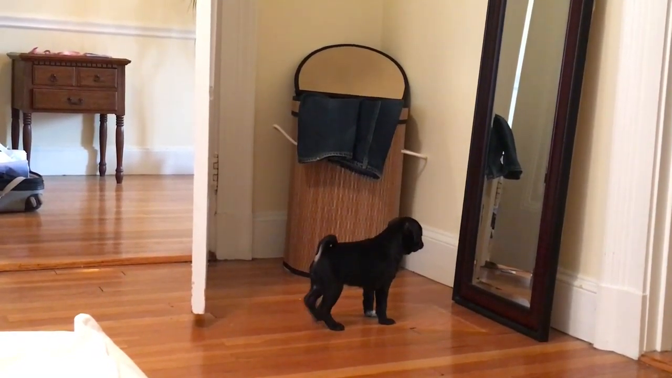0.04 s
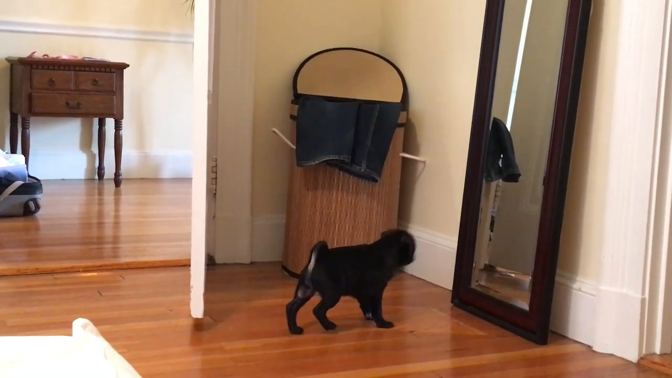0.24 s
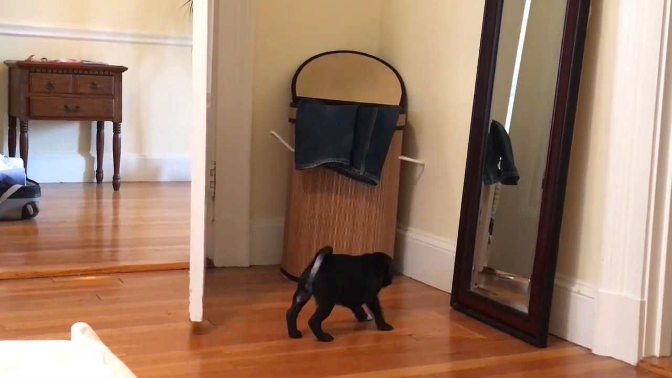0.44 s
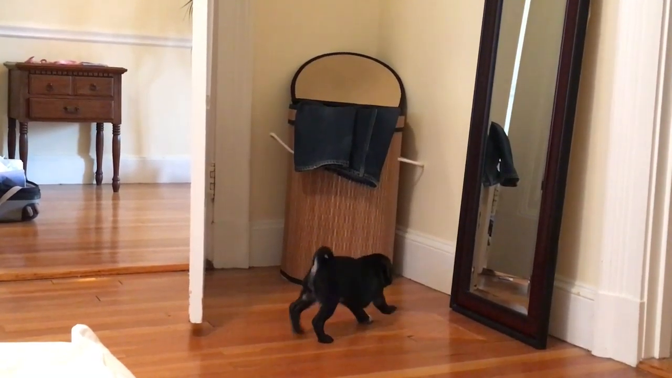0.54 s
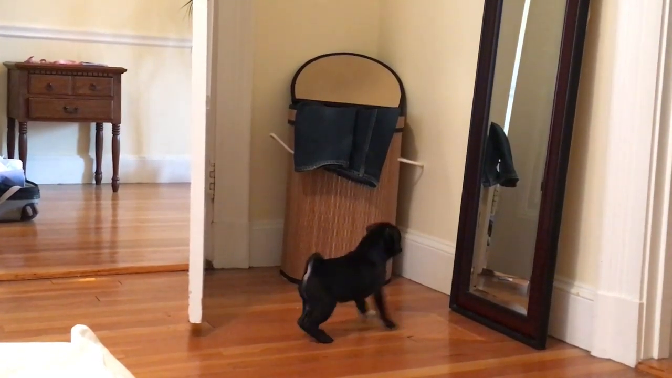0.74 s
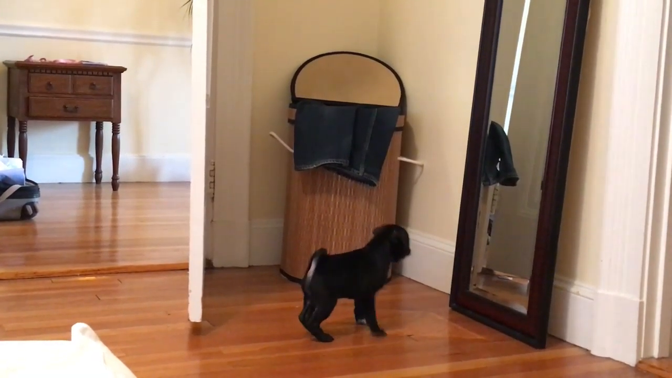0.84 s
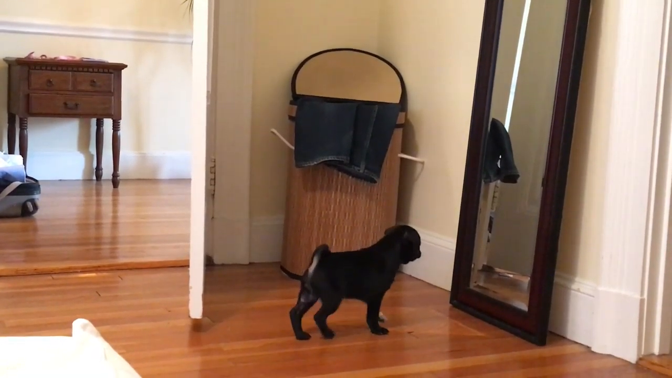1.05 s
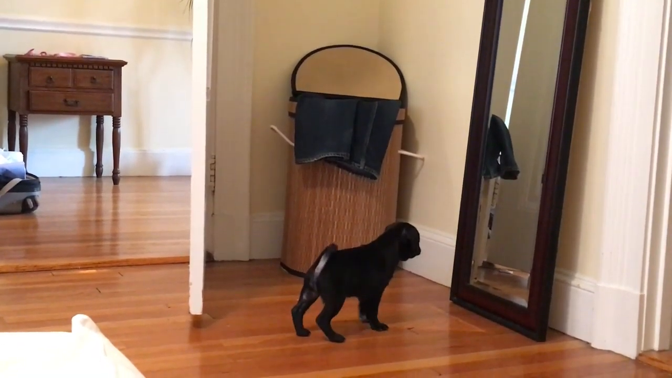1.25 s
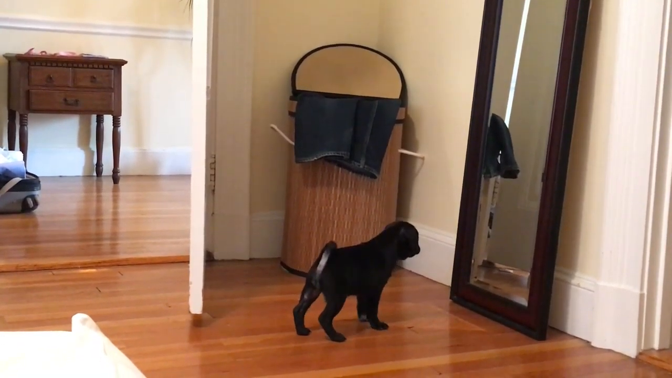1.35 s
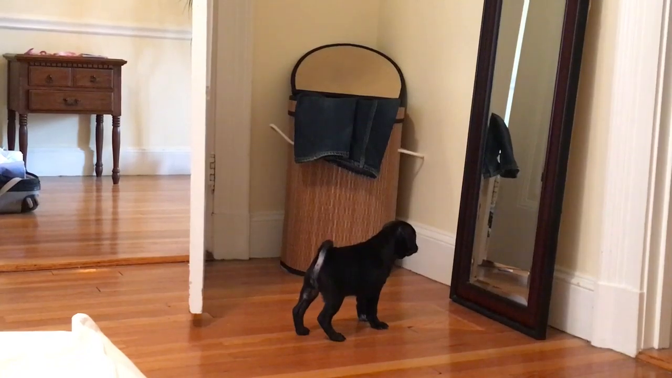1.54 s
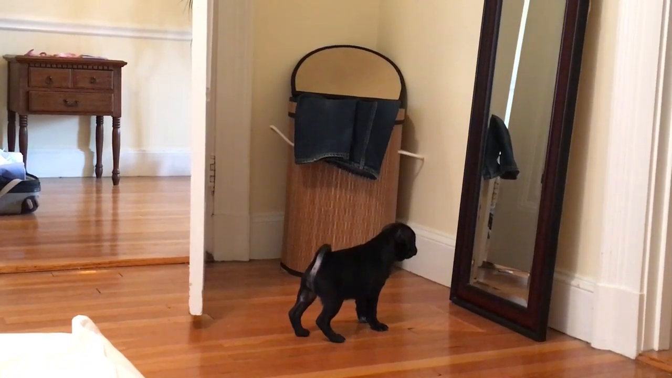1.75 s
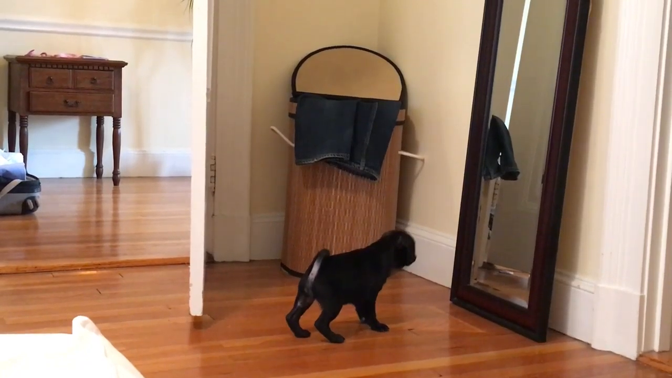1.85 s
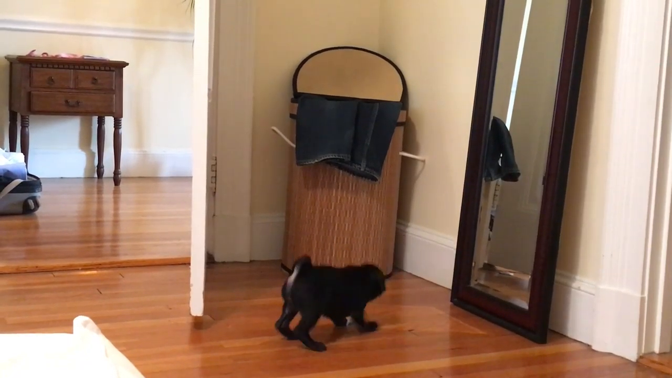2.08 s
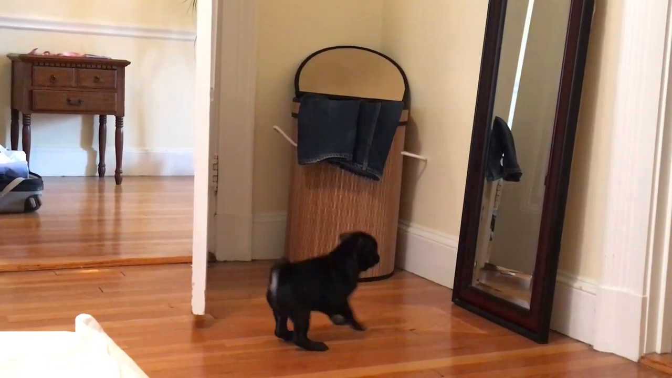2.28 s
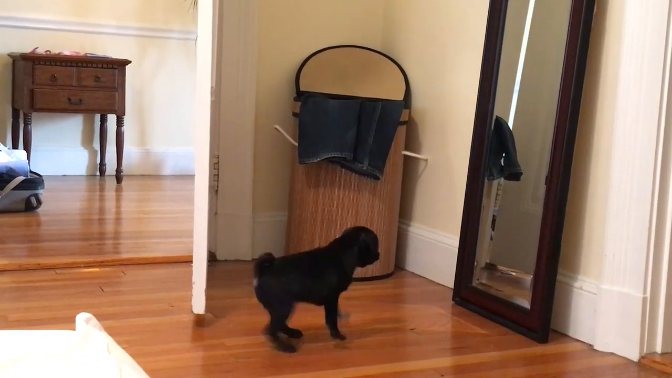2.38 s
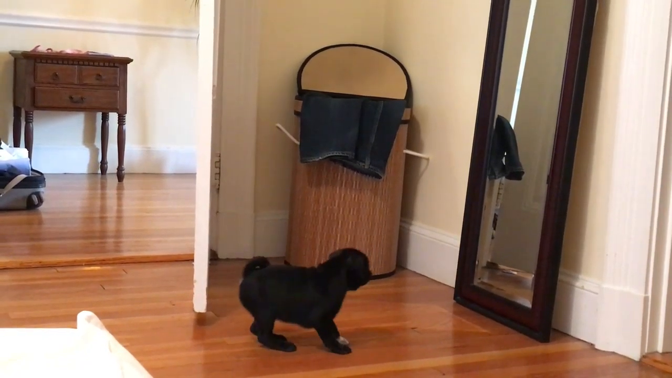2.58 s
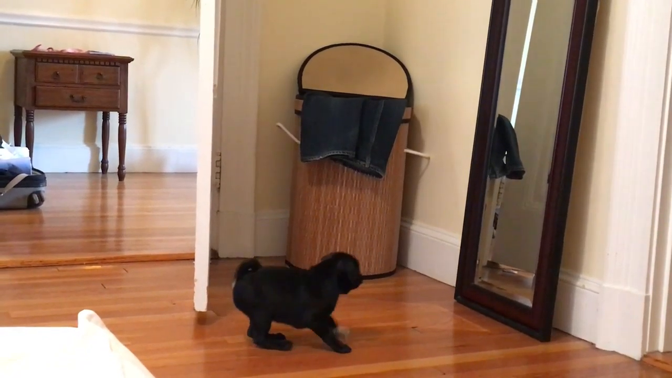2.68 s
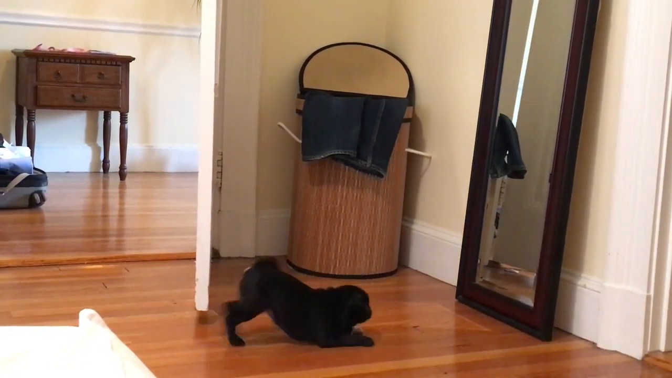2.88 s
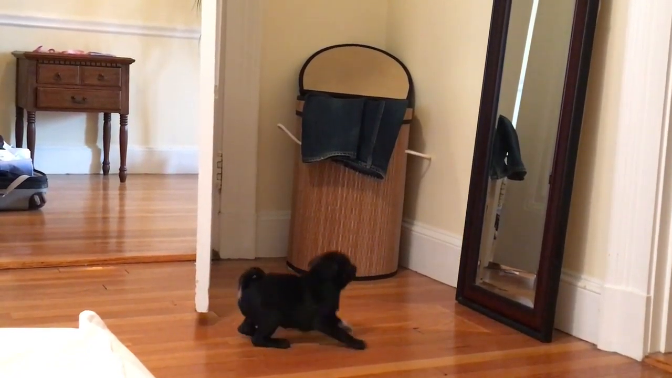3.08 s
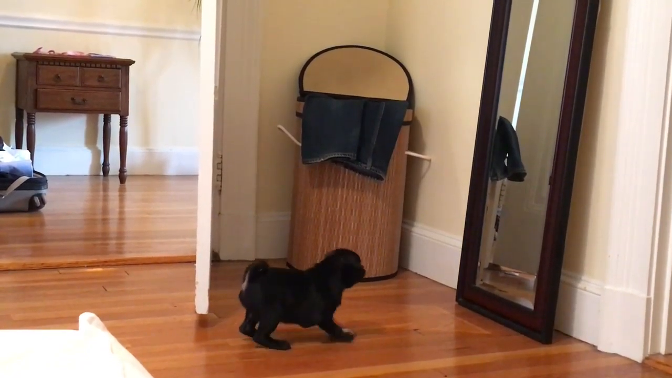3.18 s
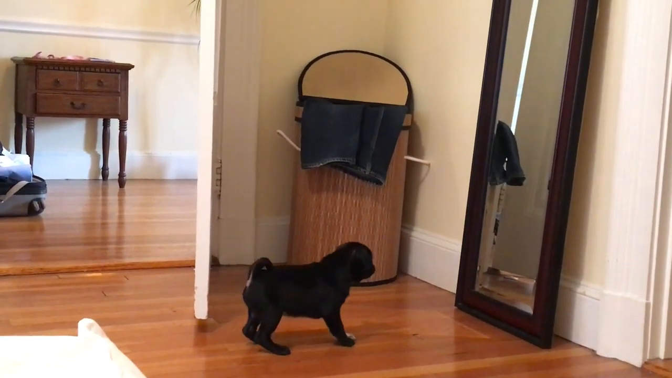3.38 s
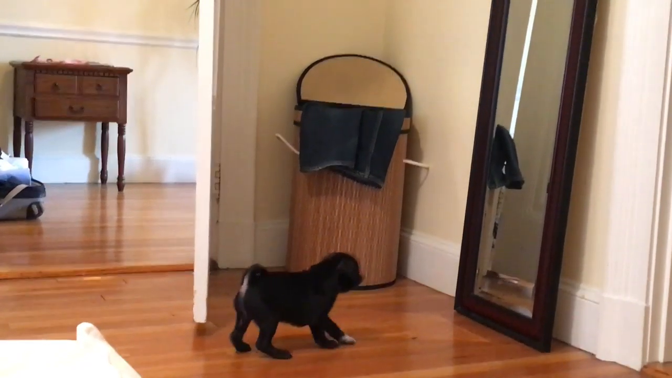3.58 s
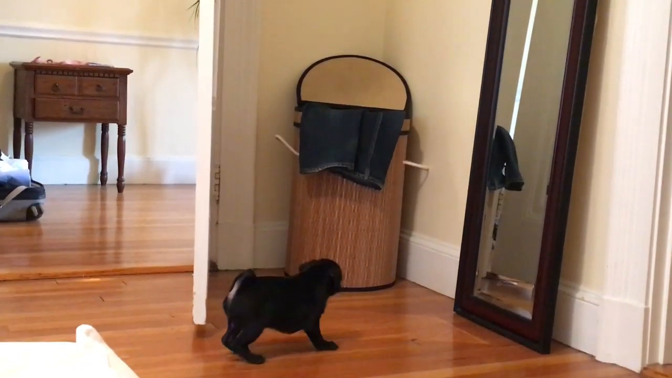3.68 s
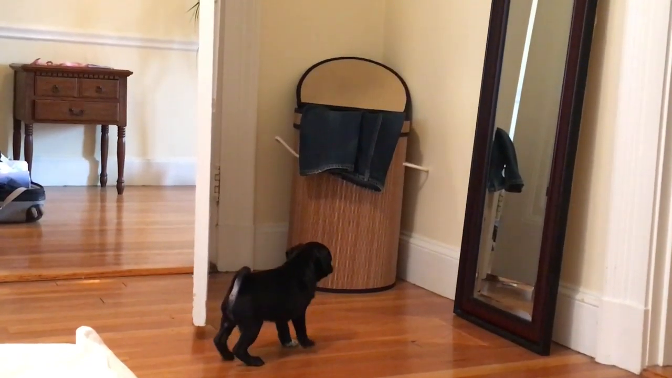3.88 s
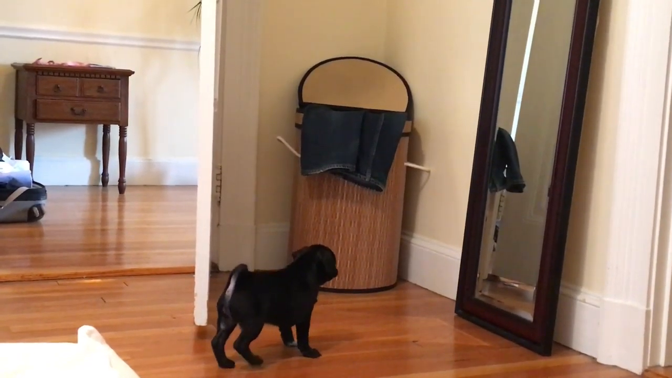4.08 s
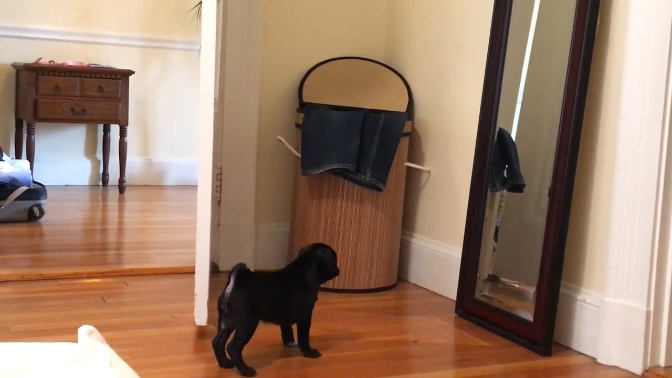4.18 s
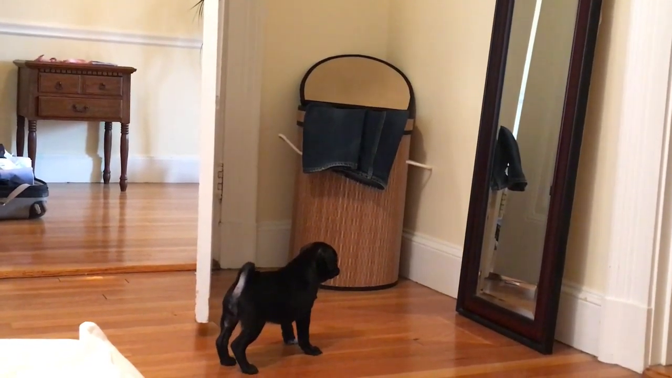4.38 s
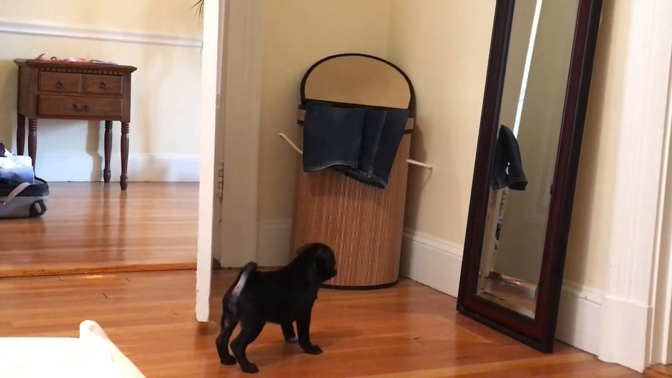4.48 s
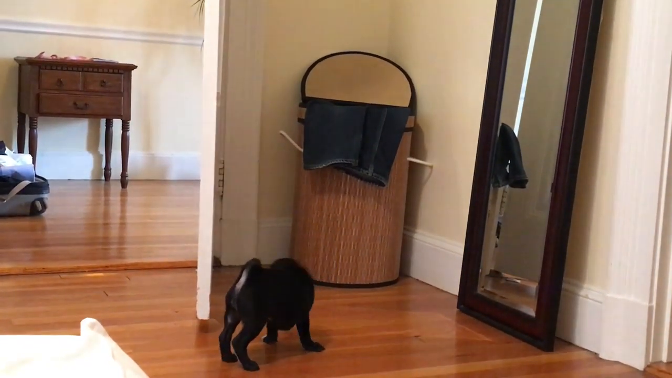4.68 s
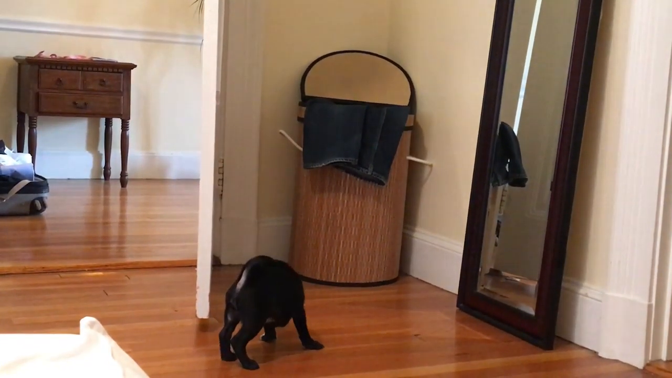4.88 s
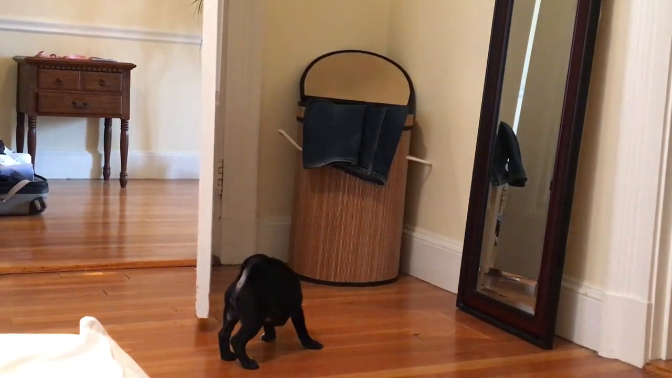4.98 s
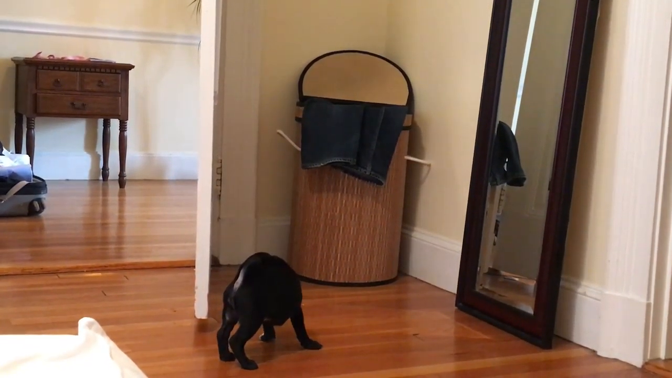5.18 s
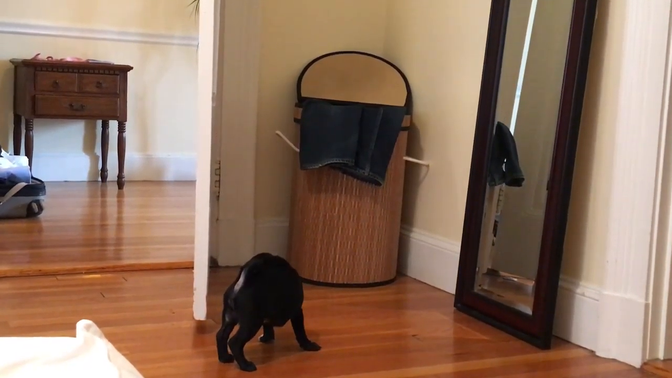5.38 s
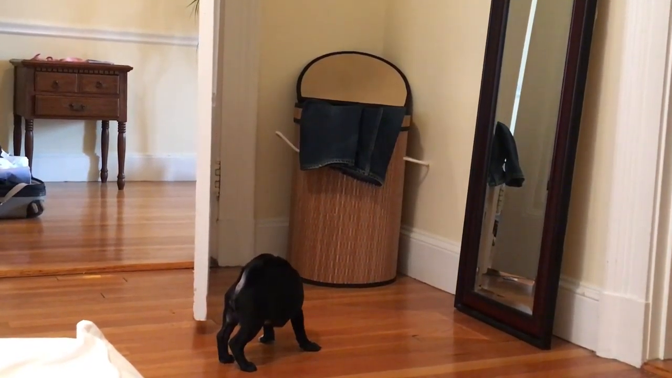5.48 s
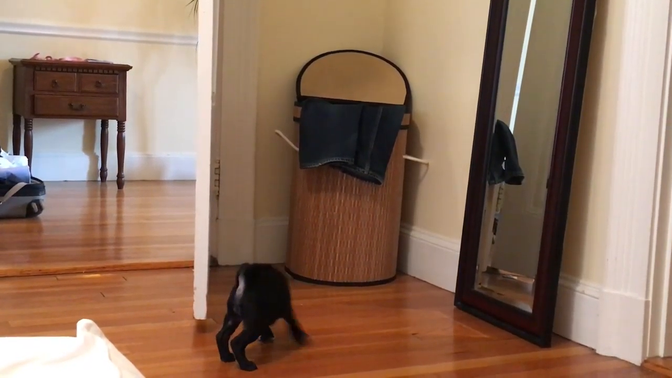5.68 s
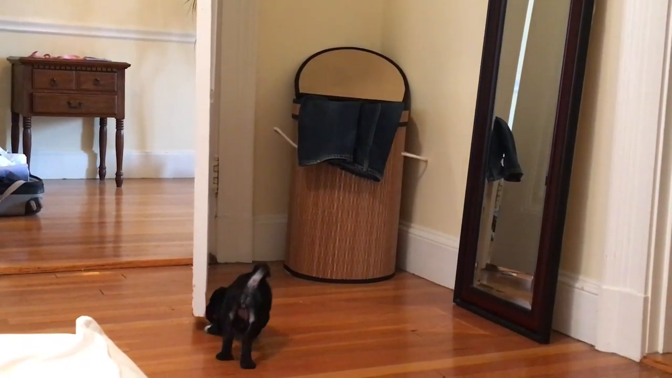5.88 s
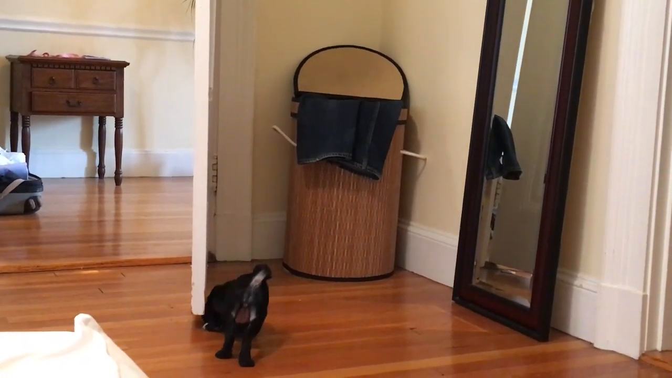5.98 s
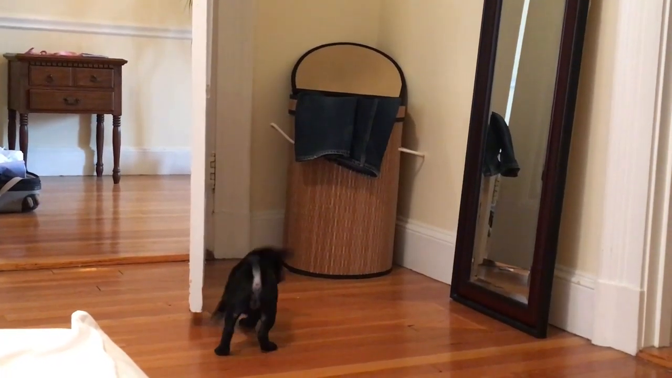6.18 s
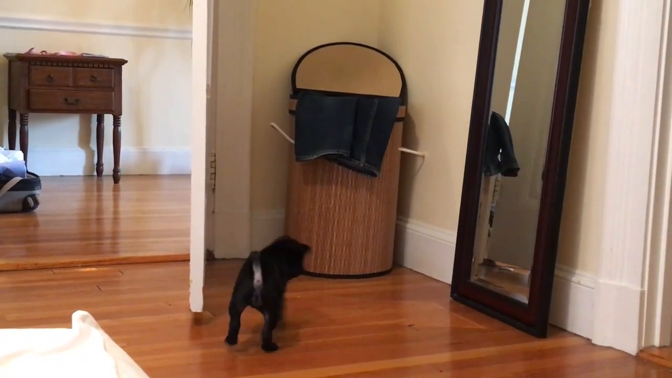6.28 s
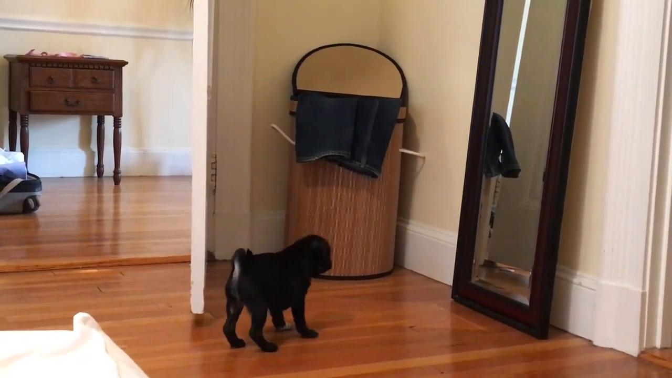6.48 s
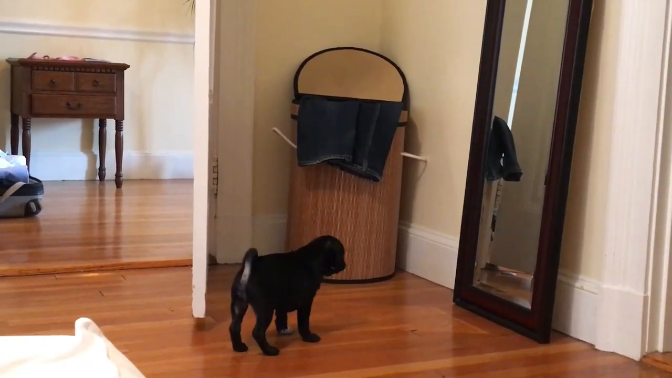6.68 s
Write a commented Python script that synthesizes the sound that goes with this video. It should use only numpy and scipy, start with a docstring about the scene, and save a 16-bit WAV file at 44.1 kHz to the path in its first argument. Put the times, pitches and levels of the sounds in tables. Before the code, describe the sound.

A tiny puppy a few metres away in a bare, echoing room. A faint whine and snuffles come first, then a loud sharp bark at two seconds and a lower, hoarser one soon after. A soft wavering growl rises into a whiny yip. Paws thump and claws tick on wood. After a pause come a rough yelp, a thin whimper and a last bright yip, over low house rumble and faint hiss.

```python
"""A bare room with a wooden floor, where a flat-faced puppy whines, barks three times, growls and yips at a mirror.
It is a few metres away. Its voice is a row of overtones plus puffs of noise, shaped by throat and mouth.
Between calls it snuffles and pants: noise rings its nose and hisses at its lips, and a nostril whistles.
Short pushes make the boards boom under its paws, and bursts of noise make its claws tick and knock.
The boards rumble on around each landing, the room echoes, and a low house rumble and a hiss lie beneath."""
import sys
import numpy as np
from scipy import signal
from scipy.fft import rfft, irfft, next_fast_len
from scipy.io import wavfile
from scipy.ndimage import uniform_filter1d, map_coordinates

SR = 44100
rng = np.random.default_rng(int(sys.argv[2]) if len(sys.argv) > 2 else 0)


def wav_record(signal):
    """Record a signal, one row per channel, as 16-bit PCM in the file named by sys.argv[1]."""
    frames = np.transpose(np.atleast_2d(signal))
    bounded = np.clip(frames, -1, 1)
    # unit amplitude maps onto the largest positive 16-bit level
    quanta = np.round(bounded * 32767).astype(np.int16)
    wavfile.write(sys.argv[1], SR, quanta)


def nominal_scale(level):
    """Amplitude ratio for a level in decibels (scalar or array-like)."""
    x = np.asarray(level, float) / 20
    return 10 ** x


N = 363825  # length in samples

# Levels in the tables are starting points: the functions and the final mix trim them.
# one list per call, of: start_s, pitch_hz, effort_db, mouth_opening_db (loudness of the treble)
CALLS = [
    [(0.05, 1070, -85, 2), (0.064, 1134, -65, 15), (0.084, 1125, -53, 13), (0.15, 1047, -63, -16)],
    [(.6, 1189, -69, -25), (.612, 1174, -37, -32), (.63, 1076, -41, -9), (.66, 1058, -40, 4),
     (.69, 1064, -62, 26), (.73, 987, -49, -14)],
    [(2.081, 1050, -41.5, -8.5), (2.095, 1098, -26.5, -13), (2.108, 1240, -18, -12),
     (2.119, 1502, -18.5, -3), (2.145, 1647, -17.5, 3), (2.16, 1200, -22, 15), (2.185, 789.7, -23.5, 2),
     (2.2, 414, -30.5, -24), (2.23, 380, -42.5, -1.5)],
    [(2.782, 241.4, -53.5, -39.5), (2.797, 300, -37, -27.5), (2.816, 386.3, -34, -16),
     (2.824, 459.5, -24, -6.5), (2.845, 519, -21.5, 3), (2.865, 561.8, -22.5, 6.5), (2.885, 498, -29, 17),
     (2.915, 374.7, -34.5, -9.5)],
    [(3.465, 163, -64.5, -8), (3.479, 159.7, -52, 3.5), (3.557, 165, -55, 3), (3.599, 182.8, -46.5, 1.5),
     (3.643, 241.5, -47, 4.5), (3.712, 303, -39, 1), (3.777, 303.2, -42.5, 14.5), (3.815, 284, -46.5, 3.5),
     (3.89, 227, -50, -1), (4.04, 191, -50, -3.5), (4.203, 191.6, -62, 6.5), (4.301, 148.3, -54, -8),
     (4.451, 183.1, -60, -6), (4.57, 193.3, -53.5, -10)],
    [(4.555, 609.2, -75.5, -12), (4.58, 650, -48.5, -19), (4.63, 719.5, -50.5, 9.5), (4.68, 779, -37, 11.5),
     (4.71, 873.3, -39, 3.5), (4.735, 934.7, -34, -6), (4.765, 975, -49, 5)],
    [(5.729, 1085, -49, -16.5), (5.739, 939, -43, 9), (5.755, 899, -40, 9), (5.772, 1000, -39, 12),
     (5.795, 921.6, -42, -7), (5.81, 522.4, -44.5, -2.5), (5.85, 300, -53, -22), (5.89, 221.4, -49, -15),
     (5.96, 196.2, -60.5, -5)],
    [(7.224, 1100, -51, -10.5), (7.245, 1000, -47.5, -16), (7.27, 880, -45, -7), (7.31, 801.6, -52, 8),
     (7.348, 800.7, -34, -9), (7.375, 809.4, -64, 11), (7.4, 789, -38, 0.5), (7.412, 784, -54, -14),
     (7.425, 769, -35, -11), (7.44, 762, -65, -4), (7.46, 710, -73, -8)],
    [(7.597, 248.8, -46.5, -29), (7.62, 285.5, -46.5, -38), (7.628, 780.6, -35, -24),
     (7.648, 857.7, -30.5, -12), (7.657, 943, -21, -14), (7.665, 1093, -32, 11.5), (7.69, 1122, -33, -1.5),
     (7.707, 1151, -36, 1.5), (7.735, 1141, -63, -3)],
]
# the vocal folds switch between ways of beating and hold each until the next:
# start_s, roughness (0-1), undertones (share kept below the pitch, 0-1, at each of two passes)
FOLD_STATES = [(0, .09, .1), (2.115, .3, .5), (2.15, .55, .9), (2.77, .22, .2), (2.875, .55, .5),
               (3.4, .5, 0), (3.67, .22, 0), (3.8, .38, 0), (4.0, .27, 0), (4.12, .5, 0), (4.28, .17, 0),
               (4.57, .1, .1), (5.7, .22, 0), (5.805, .5, .2), (7.2, .22, .1), (7.285, .14, .1),
               (7.55, .25, 0), (7.625, .26, .75)]
# throat and mouth shape in each call: frequency_hz, level_db
THROATS = [
    [(500, -23), (1100, 4.5), (2200, 3.5), (3300, -26), (4400, -28), (5500, -34), (6700, -20), (8000, -47),
     (16000, -61)],
    [(500, 0), (1080, 2), (2150, -4.5), (3200, -24.5), (4300, -20), (5400, -37), (6450, -21), (8000, -42),
     (11000, -48), (12800, -34), (16000, -54.5)],
    [(180, -57.5), (350, -16.5), (600, -16), (900, -11), (1280, -5), (1640, -8.5), (1900, -9), (2280, 0),
     (2750, -16.5), (3400, -11), (4200, -14.5), (5500, -19.5), (8280, -41.5), (12900, -33.5), (15500, -42)],
    [(120, -64), (270, -20), (500, -17), (750, -11), (1080, -2), (1450, -6.5), (1900, -13), (2500, -20),
     (3000, -16.5), (3650, -9), (4300, -13.5), (5200, -20.5), (7200, -40), (8800, -34), (12000, -31),
     (15500, -40.5)],
    [(82, -55), (180, 5), (300, -4.5), (450, 0), (620, 1), (900, -4), (1150, -15), (1580, -16.5),
     (2200, -22.5), (3000, -46), (5350, -41), (6700, -33), (7800, -47), (11500, -45), (15500, -46.5)],
    [(320, -82), (550, -10), (748, 4), (935, -5), (1990, -10.5), (2900, -36.5), (4530, -27.5),
     (5440, -37.5), (6430, -21), (7600, -27.5), (9910, -52), (15500, -46)],
    [(110, -31), (180, 4), (578, -4.5), (934, 4), (1430, 2), (1920, 0), (2270, -1), (3000, -3),
     (3480, -4.5), (5520, -12.5), (6900, -33.5), (15000, -41)],
    [(380, -24), (650, -3.5), (836, 4.5), (1110, -11.5), (1620, -3.5), (2870, -22), (4060, -15),
     (5290, -32), (6460, -19), (7980, -36.5), (11600, -63), (13000, -27), (15500, -64)],
    [(120, -55), (280, -3.5), (600, -8.5), (850, 2), (1130, -1.5), (1500, -9), (2250, -9), (2750, -27),
     (3350, -9.5), (3800, -3.5), (4450, -4.5), (4900, -16), (5500, -5.5), (8000, -26), (11800, -19),
     (15500, -38.5)],
]
# breaths between calls, one list per stretch:
# start_s, length_s, snuffle_db, hiss_db (over the snuffle), sharp_top_db (over the hiss)
BREATHS = [
    [(.224, 0.083, -73, -0.5, 5), (.38, 0.073, -60, -28, 22), (.43, 0.028, -69.5, -9.5, 19),
     (.565, 0.023, -63.5, -9, -11)],
    [(.735, 0.012, -70.5, -5, 6.5), (.86, 0.1, -66.5, -7.5, -4.5), (.952, 0.083, -69, -4.5, -6.5),
     (1.07, 0.13, -71.5, -14.5, -1)],
    [(1.35, 1, -81, -0.5, 5.5), (1.86, 0.017, -55, -25, -0.5)],
    [(2.4, 0.01, -53.5, -20.5, -9), (2.43, 0.16, -72.5, -5, 13.5), (2.594, 0.053, -62.5, -11, -15.5)],
    [(3.0, 0.055, -55, -14.5, 4), (3.09, 0.013, -58.5, -4, -20), (3.17, 0.086, -61, -11, 11.5),
     (3.29, 0.068, -68.5, -13.5, -19), (3.48, 0.17, -81, -2, 7)],
    [(5.785, 0.076, -70, -6, 12), (5.9, 0.032, -64, -9.5, 3), (5.99, 0.24, -60.5, -30, 2),
     (6.05, .11, -79.5, -0.5, 11.5), (6.225, 0.089, -57.5, -8.5, 4.5), (6.432, .04, -79, 4, -13.5),
     (6.5, .08, -77.5, -14, -12)],
    [(7.72, 0.095, -66, 8, -2.5), (7.85, .18, -66, -2.5, 1.5), (8.19, .06, -69, -11.5, 12.5)],
]
# resonances of the nose in each stretch, passed through twice: frequency_hz, width_hz, level_db
NOSES = [
    [(1580, 500, 7), (4860, 700, 2), (3300, 900, -33)],
    [(1680, 480, -5.5), (3830, 860, -9), (1000, 440, -5)],
    [(1300, 1400, 3.5), (2200, 650, -7), (5700, 700, -4.5)],
    [(1287, 290, 0.5), (2300, 410, 4), (3700, 500, -2)],
    [(1351, 350, 2), (3720, 660, -2.5), (6580, 210, -1)],
    [(1570, 350, 12), (3760, 280, -3), (1100, 1900, 11)],
    [(1200, 1800, -1), (3520, 920, -0.5), (6420, 420, -0.5)],
]
# colour of the air at the lips: frequency_hz, level_db (per Hz)
AIR_TONE = [(2500, -28.5), (4300, -7.5), (5400, -11), (6600, 1), (7600, -5.5), (9500, -3), (11000, -8.5),
            (12500, -6.5), (15600, -8)]
# a nostril whistles: time_s, pitch_hz, level_db
WHISTLE = [(0.565, 7200, -61), (0.593, 7570, -60), (0.691, 7500, -81), (0.699, 7000, -58),
           (0.711, 6908, -91), (0.72, 6959, -80)]
# paws landing on the boards: start_s, level_db, contact_ms
PAWS = [(0.439, -52, 1.4), (0.736, -37.5, 1.2), (0.868, -39, 3.1), (0.93, -43.5, 1.6), (1.01, -42, 1.5),
        (1.131, -57, 1.6), (1.458, -55, 1.6), (1.849, -44, 1.8), (2.102, -33.5, 1.3), (2.221, -37.5, 1.26),
        (2.438, -50, 1.3), (2.537, -32, 1.3), (2.691, -48, 1.8), (2.904, -29, 1.3), (3.05, -26, 1.7),
        (3.261, -28.5, 0.56), (3.632, -37, 1.8), (4.087, -42.5, 1.8), (4.778, -37.5, 1),
        (4.888, -50.5, 1.6), (5.854, -32.5, 1.7), (5.969, -38.5, 2), (6.242, -42, 2.6), (6.432, -38, 2),
        (6.619, -48, 1.78), (7.459, -59, 1.7), (8.01, -27, 2.5), (8.225, -37, 2)]
# resonances of the floor boards: frequency_hz, width_hz, level_db
BOARDS = [(60, 40, -7), (103.76, 39, 1), (132, 20, 3), (191, 40, -5), (300, 94, -4)]
# claws touching wood: start_s, level_db, dull_knock_db (added to the level)
CLAWS = [(0.2266, -41, -10.5), (0.382, -53.5, -1), (0.7352, -45.5, -8), (0.8593, -50.5, -6),
         (0.9577, -50.5, -13), (1.074, -44, -25), (1.8619, -51.5, 6.5), (2.4391, -44.5, -9.5),
         (2.5295, -47.5, -0.5), (2.5946, -43, -4.5), (3.0194, -34, -8.5), (3.1779, -38, -26),
         (4.0465, -43.5, -15), (4.2464, -59, 2), (5.9195, -38, -5), (6.1501, -39, -35),
         (6.2325, -59.5, 14.5), (6.4354, -37.5, -15.5), (6.5, -62, 10), (8.0024, -49, -1.5),
         (8.2157, -53, -3.5)]
# colour of the sharp tick: frequency_hz, level_db
TICK_TONE = [(1500, -22), (4000, 1), (7000, -7.0), (9000, -11.5), (15000, -12.5)]
# resonance of the dull knock: frequency_hz, width_hz, level_db
KNOCK_TONE = [(1200, 650, 0.0033)]
# how long the echo takes to fall by 60 dB: frequency_hz, time_s
ECHO = [(150, 0.46), (500, 0.36), (1500, 0.35), (4000, 0.36), (12000, 0.22)]
# colour of the house rumble: frequency_hz, level_db (per Hz)
RUMBLE_TONE = [(15, -50.5), (25, -25), (50, 7.5), (86, -4), (107, 0), (179, -11.5), (458, -22.5),
               (500, -24.5), (650, -52), (1100, -120)]
# colour of the microphone hiss: frequency_hz, level_db (per Hz)
HISS_TONE = [(180, -36.5), (300, -4.5), (453, -10.5), (720, -13.5), (1090, -14), (1490, -18.5), (1850, -14),
             (2400, -22.5), (3130, -20.5), (15600, -29.5)]

RUMBLE_DB, HISS_DB = -66, -74.5
SWITCH_S = .02  # time the folds take to switch
BREATH_RISE_S, BREATH_SAG_DB_PER_S, BREATH_FADE_DB_PER_S = .015, 15.5, 180
# shaking of the boards around a -36.5 dB landing, change per dB of landing, and shaking at rest
TREAD_DB, TREAD_FOLLOWS, TREAD_REST_DB = -59.5, 0.36, -73.5
TREAD_RISE_S, TREAD_FADE_DB_PER_S = .04, 90
SPREAD_RAD = .35  # higher overtones are shifted more in phase, which blunts each pulse
FRAY = 1.3  # uneven closing smears high overtones first (radians of wander per kHz at full roughness)
TOP_HZ = 15800  # highest overtone


def call(rows, throat):
    """Fold pulses that waver in timing and size with roughness, plus puffs of air, pass throat and mouth."""
    start, gate, t, (pitch_hz, effort_db, mouth_db) = played(rows)
    n = len(t)
    switch_s, *states = np.transpose(FOLD_STATES)
    now = np.searchsorted(switch_s, t) - 1
    rough, undertones = [uniform_filter1d(c[now], size=int(SWITCH_S * SR)) for c in states]
    jitter = 1 + .12 * rough * wobble(n, pitch_hz.mean() / 2) + .04 * rough * wobble(n, 60)
    turns = np.cumsum(pitch_hz * jitter) / SR  # cycles of the folds so far

    pulses = np.zeros(n)
    for k in range(1, int(TOP_HZ / pitch_hz.min())):
        # each overtone swells and fades, and slips in phase, on its own
        swell = nominal_scale(2.8 * random_line(n, 1200))
        slip = FRAY * rough * k * pitch_hz / 1000 * random_line(n, 200)
        overtone = np.cos(2 * np.pi * k * turns + SPREAD_RAD * k * k + slip)
        pulses += swell * overtone * (k * pitch_hz < TOP_HZ)
    shimmer = nominal_scale(6 * rough * wobble(n, pitch_hz.mean() * .6))
    puffs = (1 + np.cos(2 * np.pi * turns)) * rng.standard_normal(n)  # air escapes once a cycle
    folds = (1 - rough) * unit(pulses * np.sqrt(pitch_hz) * shimmer) + rough * unit(puffs)
    for _ in range(2):
        folds = above_pitch(folds, pitch_hz, undertones)
    voice = coloured(folds, throat)

    # shut lips take the treble first
    low, lowest = below(voice, 1750), below(voice, 750)
    voice = lowest + nominal_scale(mouth_db / 2) * (low - lowest) + nominal_scale(mouth_db) * (voice - low)
    loudness = np.sqrt(np.abs(uniform_filter1d(voice ** 2, size=1500)) + 1e-12)
    steady = voice / loudness  # so that effort alone sets the level
    return start, gate * nominal_scale(effort_db - 0.5) * steady


def breathing():
    """Rough air rings the nose and hisses at the lips, fluttering a little; each breath rises, sags and fades."""
    out = np.zeros(N)
    for rows, nostrils in zip(BREATHS, NOSES):
        s, length, nose_db, air_db, sharp_db = np.transpose(rows)[..., None]
        start = round(s.min() * SR)
        u = np.arange(SR)[None] / SR + s.min() - s  # seconds into each breath
        sag_db = BREATH_SAG_DB_PER_S * np.clip(u, 0, length)
        fade_db = BREATH_FADE_DB_PER_S * np.maximum(u - length, 0)
        shape = np.clip(u / BREATH_RISE_S, 0, 1) * nominal_scale(nose_db - sag_db - fade_db)
        nose, air = rng.standard_normal((2, SR))
        flutter = wobble(SR, 45)

        snuffle = unit(resonant(resonant(nose, nostrils), nostrils))
        add(out, start, shape.sum(axis=0) * nominal_scale(-5 + 2.5 * flutter) * snuffle)

        air = coloured(air, AIR_TONE)
        soft = below(air, 8530)
        hiss = (nominal_scale(air_db) * shape).sum(axis=0) * unit(soft)
        hiss += (nominal_scale(air_db + sharp_db - 6.0) * shape).sum(axis=0) * unit(air - soft)
        add(out, start, nominal_scale(1.5 * flutter) * hiss)

    start, gate, t, (hz, db) = played(WHISTLE)
    turns = np.cumsum(hz + 90 * wobble(len(t), 300)) / SR
    add(out, start, gate * nominal_scale(db) * np.sin(2 * np.pi * turns))
    return out


def paws():
    """Pads push the boards into a short boom; a shorter contact sounds higher."""
    pushes = np.zeros(N)
    t_ms = np.arange(SR // 10) / SR * 1000
    for s, db, contact_ms in PAWS:
        u = t_ms / max(contact_ms, .5)
        uneven = 1 + 0.56 * wobble(len(u), 580)
        add(pushes, round(s * SR), nominal_scale(db + 7.5) * u * np.exp(-u) * uneven)
    return resonant(pushes, BOARDS)


def claws():
    """Each touch is a sharp tick, dying within 20 ms, and a duller, longer knock of wood."""
    ticks, knocks = np.zeros(N), np.zeros(N)
    t = np.arange(SR // 20) / SR
    for s, db, knock_db in CLAWS:
        tick, knock = rng.standard_normal((2, len(t)))
        add(ticks, round(s * SR), nominal_scale(db - 6 - 60 * t / .02) * tick)
        rise = 1 - np.exp(-t / 0.0053)
        add(knocks, round(s * SR), nominal_scale(db + knock_db + 11.5 - 60 * t / 0.071) * rise * knock)
    return coloured(ticks, TICK_TONE) + resonant(knocks, KNOCK_TONE)


def tread():
    """The puppy shifts its weight around each landing, so the boards rumble on for a moment, unevenly."""
    s, db, _ = np.transpose(PAWS)[..., None]
    t = np.arange(0, N / SR, .005)
    u = t - s + TREAD_RISE_S  # the swell starts just before the landing
    peak_db = TREAD_DB + TREAD_FOLLOWS * (db + 36.5)
    fade_db = TREAD_FADE_DB_PER_S * np.maximum(u - TREAD_RISE_S, 0)
    swell = np.clip(u / TREAD_RISE_S, 0, 1) * nominal_scale(peak_db - fade_db)
    total = np.sqrt(nominal_scale(TREAD_REST_DB) ** 2 + (swell ** 2).sum(axis=0))
    level = np.interp(np.arange(N) / SR, t, total)
    return level * nominal_scale(2.5 * wobble(N, 6.9)) * unit(resonant(wobble(N, 500), BOARDS))


def room(x):
    """Echoes die at their own speed for each frequency; a new pattern each half second, as the puppy moves."""
    out, hop = np.zeros(N), SR // 2
    for start in range(0, N, hop):
        hz, t, z = signal.stft(rng.standard_normal(SR * 3 // 4), SR, nperseg=256)
        decay = nominal_scale(-60 * t / along(ECHO, hz)[:, None])
        tail = signal.istft(z * decay, SR, nperseg=256)[1]
        tail = np.pad(tail / np.linalg.norm(tail), (150, 0))  # the echo comes 150 samples late
        add(out, start, signal.fftconvolve(x[start:start + hop], tail))
    return out


def background():
    """Low house rumble that wavers, over steady microphone hiss: two coloured noises."""
    rumble = unit(coloured(rng.standard_normal(N), RUMBLE_TONE))
    hiss = unit(coloured(rng.standard_normal(N), HISS_TONE))
    return nominal_scale(RUMBLE_DB + 2.9 * wobble(N, 11)) * rumble + nominal_scale(HISS_DB) * hiss


def above_pitch(x, pitch_hz, undertones):
    """Takes away the mean over one cycle, which weakens sound below the pitch; undertones is the share kept."""
    i, total, half = np.arange(len(x)), np.cumsum(x), SR / pitch_hz / 2
    mean = (np.interp(i + half, i, total) - np.interp(i - half, i, total)) / (2 * half)
    return x - (1 - undertones) * mean


def below(x, edge_hz):
    """The part of x under an edge."""
    return filtered(x, lambda hz: 1 / (1 + (hz / edge_hz) ** 6))


def coloured(x, spectrum):
    """x through a (Hz, dB) spectrum that responds as promptly as it can (minimum phase)."""
    def response(hz):
        cepstrum = irfft(np.log(nominal_scale(along(spectrum, hz)) + 1e-6))
        half = len(cepstrum) // 2
        # folding the second half onto the first leaves nothing ahead of the sound
        cepstrum[1:half] *= 2
        cepstrum[half + 1:] = 0
        return np.exp(rfft(cepstrum))[:len(hz)]
    return filtered(x, response)


def resonant(x, modes):
    """x rings (Hz, width Hz, dB) resonances, added with alternating sign."""
    def response(f):
        total = 0
        for k, (centre, width, db) in enumerate(modes):
            damping = 1j * f * width
            total = total + (-1) ** k * nominal_scale(db) * damping / (centre * centre - f * f + damping)
        return total
    return filtered(x, response)


def filtered(x, response):
    """x times a complex response of frequency."""
    m = 2 * next_fast_len(len(x) // 2 + 4096)
    return irfft(rfft(x, m) * response(np.fft.rfftfreq(m, 1 / SR)), m)[:len(x)]


def along(points, hz):
    """(Hz, value) points read on a log axis."""
    f, v = np.transpose(points)
    return np.interp(np.log(hz + 1), np.log(f + 1), v)


def played(rows):
    """First sample, a soft on-off gate, the times, and one value per sample for each later column."""
    s, *cols = np.transpose(rows)
    t = np.arange(max(s[0], 0), min(s[-1], N / SR), 1 / SR)
    gate = np.clip(np.minimum((t - t[0]) / .004, (t[-1] - t) / .015), 0, 1)
    return round(t[0] * SR), gate, t, [np.interp(t, s, c) for c in cols]


def wobble(n, rate):
    """A smooth random curve with rate random points a second."""
    return map_coordinates(rng.standard_normal(int(n * rate / SR) + 4), [np.arange(n) * rate / SR])


def random_line(n, gap):
    """Straight lines between random points, gap samples apart."""
    knots = rng.standard_normal(n // gap + 2)
    return np.interp(np.arange(n) / gap, np.arange(len(knots)), knots)


def unit(x):
    """Scaled to rms 1."""
    return x / np.sqrt(np.mean(x ** 2) + 1e-20)


def add(track, start, x):
    """Mixes x into track."""
    track[start:start + len(x)] += x[:len(track) - start]


def scene():
    """The puppy, heard direct and through the room, over the shaking boards and the background."""
    voice = np.zeros(N)
    for rows, throat in zip(CALLS, THROATS):
        add(voice, *call(rows, throat))
    small = breathing() + claws()
    thumps = nominal_scale(-5) * paws()
    direct = voice + small + nominal_scale(-6.5) * thumps
    echo = room(nominal_scale(-2.5) * voice + nominal_scale(-2.5) * small + nominal_scale(3.0) * thumps)
    return (direct + echo + tread() + background())[None]


def band_limit(x):
    """A steep low-pass at the top of the band."""
    return signal.sosfilt(signal.butter(12, 15700, fs=SR, output="sos"), x)


def record(dry):
    """Turns the finished mix into the sound that is saved."""
    return band_limit(dry)


dry = scene()
out = record(dry)
wav_record(out)
```